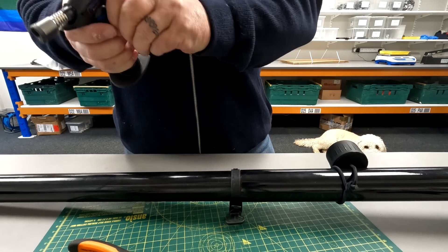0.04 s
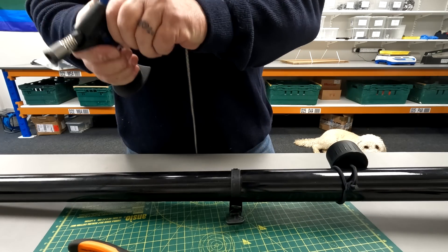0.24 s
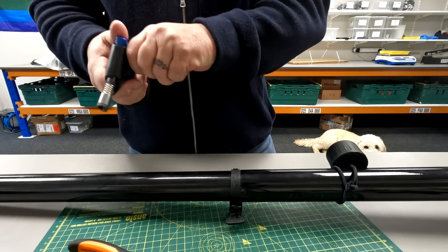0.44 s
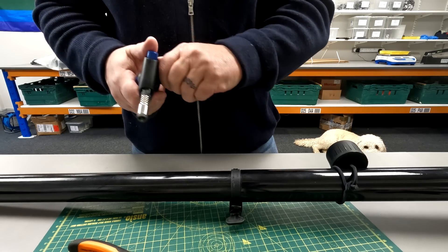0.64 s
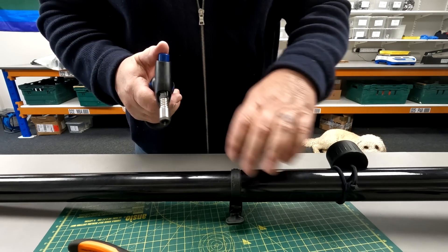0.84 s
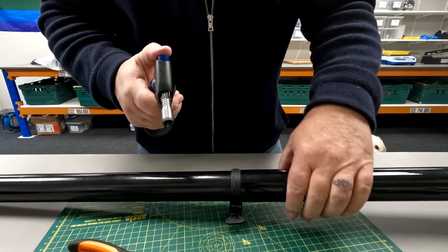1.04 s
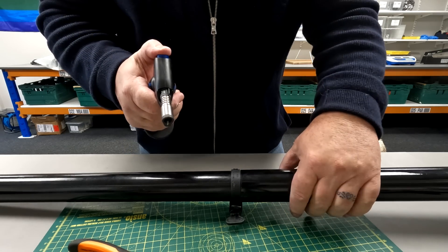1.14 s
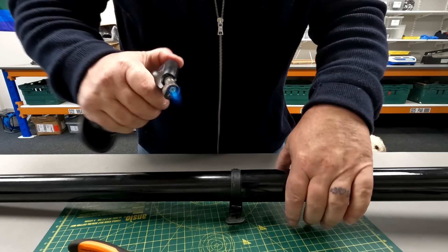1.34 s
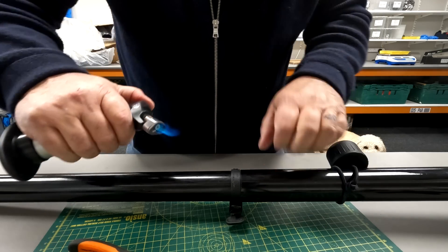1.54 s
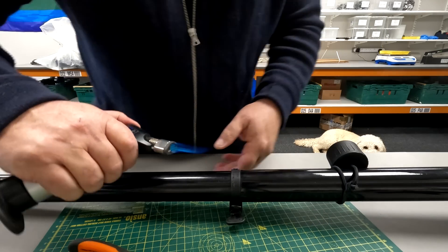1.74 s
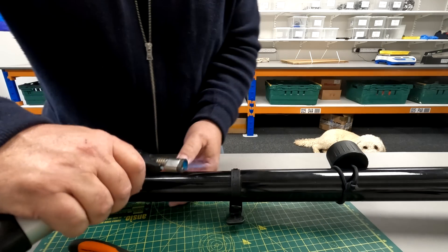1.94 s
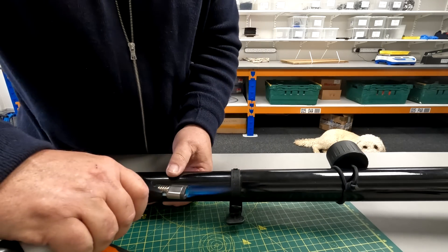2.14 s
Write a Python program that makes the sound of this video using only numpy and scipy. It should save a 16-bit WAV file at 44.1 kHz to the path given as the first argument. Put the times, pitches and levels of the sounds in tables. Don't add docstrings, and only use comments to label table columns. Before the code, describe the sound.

A small gas torch close to a stereo microphone in a quiet, hard-walled workshop: light knob ticks, faint gas seep, two sharp igniter snaps, a soft ignition pop, then steady hissing flame with a thin whistle.

```python
import sys
import numpy as np
from scipy import signal
from scipy.io import wavfile
from scipy.ndimage import uniform_filter1d

SR = 44100
rng = np.random.default_rng(int(sys.argv[2]) if len(sys.argv) > 2 else 0)


def inscribe(sig):
    pcm = np.round(np.clip(np.atleast_2d(sig).T, -1, 1) * 32767)
    wavfile.write(sys.argv[1], SR, pcm.astype(np.int16))


def convert_level_to_amplitude(level_db):
    exponent = np.asarray(level_db, float) / 20
    return 10 ** exponent


N = 96534

# (frequency [Hz], correlation [0-1])
NEAR_SAME = [(60, 1), (300, 0.81), (1600, 0.96), (5000, 0.74), (15000, 0.51)]


def evened(x):
    return x / np.sqrt(np.mean(x ** 2) + 1e-20)


def read(points, hz):
    f, value = np.transpose(points)
    return np.interp(np.log(hz + 1), np.log(f + 1), value)


def gain_curve(rows, col=1, edge=.01):
    s, db = np.transpose(rows)[[0, col]]
    s = np.r_[s[0] - edge, s, s[-1] + edge]
    db = np.r_[-120, db, -120]
    return convert_level_to_amplitude(np.interp(np.arange(N) / SR, s, db))


def add(mix, s, sound):
    part = mix[..., round(s * SR):][..., :sound.shape[-1]]
    part += sound[..., :part.shape[-1]]


def ring(x, hz, width):
    r = np.exp(-np.pi * width / SR) * np.exp(2j * np.pi * hz / SR)
    for _ in range(2):
        x = signal.lfilter([1 - abs(r)], [1, -r], x)
    return 2 * x.real


def noise(colour, same, patchy_db, flicker_db):
    frames = N // 256 + 5
    hz = np.fft.rfftfreq(1024, 1 / SR)
    a, b, c, d, patch = rng.standard_normal((frames, 513, 5)).T
    patch = uniform_filter1d(patch, size=10, axis=0)
    patch = evened(uniform_filter1d(patch, size=9, axis=1))
    like = np.clip(read(same, hz), -1, 1)[:, None]
    left = a + 1j * b
    right = like * left + np.sqrt(1 - like ** 2) * (c + 1j * d)
    flicker = flicker_db * rng.standard_normal(frames)
    z = np.array([left, right]) * convert_level_to_amplitude(read(colour, hz)[:, None] + patchy_db * patch + flicker)
    return evened(signal.istft(z, nperseg=1024, noverlap=768)[1][:, :N])


def rings(table, patchy_db):
    x = noise([(20, 0), (20000, 0)], NEAR_SAME, patchy_db, flicker_db=0.5)
    return sum(convert_level_to_amplitude(db) * evened(ring(x, hz, width)) for hz, width, db in table)


def swell(start, length, db, hz, width):
    u = np.clip((np.arange(N) / SR - start) / length, 0, 1)
    return np.sin(np.pi * np.sqrt(u)) * rings([(hz, width, db)], patchy_db=1.5)


def snap(impacts, modes):
    # (frequency [Hz], density [dB per Hz])
    crack_colour = [(800, -36), (1400, -11), (3000, -5), (6500, 0), (9500, -5), (16000, -6)]
    out, t = np.zeros((2, N)), np.arange(5000) / SR
    grit = noise(crack_colour, NEAR_SAME, patchy_db=1.5, flicker_db=-2.5)[0]
    low_modes = sum(m[0] < 5200 for m in modes)
    for s, db in impacts:
        luck = rng.uniform([.7, .994], [1.1, 1.006], (len(modes), 2))
        luck[:low_modes:2, 0] *= -1
        body = np.zeros(len(t))
        for (hz, mode_db, t60), (strength, detune) in zip(modes, luck):
            body += strength * convert_level_to_amplitude(mode_db - 60 * t / t60) * np.sin(2 * np.pi * hz * detune * t)
        crack = convert_level_to_amplitude(-5 - 60 * t / .009) * grit[round(s * SR):][:5000]
        add(out, s, convert_level_to_amplitude(db) * np.minimum(t / .0002, 1) * np.array([crack, body]))
    return out


def workshop():
    # (frequency [Hz], density [dB per Hz])
    air_colour = [(20, 3), (80, 2), (300, -4), (660, -11.5), (1000, -18), (2000, -15), (3000, -16),
                  (6000, -16), (12800, -24.5), (13100, -53)]
    # (frequency [Hz], correlation [0-1])
    air_same = [(60, 0.93), (250, 0.81), (900, 0.022), (3800, 0.34), (15000, 0.68)]
    # (time [s], level [dB])
    tone_curve = [
        (0, -52),
        (.15, -57.5),
        (.45, -59),
        (.75, -58.5),
        (.95, -71),
        (1.3, -52.5),
        (2.19, -61),
    ]
    hum_hz = 48.4
    rumble = evened(ring(rng.standard_normal(N), hum_hz, width=23))
    tone = np.sqrt(2) * gain_curve(tone_curve) * np.sin(2 * np.pi * hum_hz * np.arange(N) / SR)
    air = noise(air_colour, air_same, patchy_db=1.5, flicker_db=0.0)
    return convert_level_to_amplitude(-63.5) * air + convert_level_to_amplitude(-62) * rumble + tone


def thumps():
    # (time [s], level [dB], frequency [Hz], t60 [s])
    pushes = [(1.102, -32, 90, .053), (1.105, -40, 215, .07), (1.15, -50, 130, .1), (1.309, -22, 71, .082),
              (1.314, -20.5, 162, .042), (1.425, -26, 139, .045), (1.427, -31, 350, .028),
              (1.427, -40, 616, .035), (1.426, -46, 950, .03), (1.425, -48, 1550, .03),
              (1.425, -54, 2300, .02), (1.4375, -30, 200, .04), (1.436, -38, 480, .035),
              (1.7, -37, 60, .15), (1.772, -33, 120, .095)]
    out, t = np.zeros(N), np.arange(9000) / SR
    for s, db, hz, t60 in pushes:
        add(out, s, convert_level_to_amplitude(db - 60 * t / t60) * np.minimum(t / 0.0024, 1) * np.sin(2 * np.pi * hz * t))
    return out


def ticks():
    # (time [s], peak level [dB], t60 [s], ring frequency [Hz])
    touches = [(.0005, -36.5, 0.023, 4750), (.0035, -44.5, 0.027, 4400), (0.022, -47.5, 0.038, 13000),
               (0.032, -43, 0.012, 2740), (0.038, -38, 0.048, 6020), (0.144, -50, 0.016, 3680),
               (.15, -44, 0.02, 4480), (0.153, -47.5, 0.02, 5100), (.153, -58, 0.06, 5850),
               (0.167, -50, 0.058, 6000), (0.184, -43.5, 0.019, 4130), (.19, -49, 0.027, 6200),
               (.233, -66, 0.018, 6300), (0.409, -44, 0.025, 3050), (0.415, -49.5, 0.13, 1390),
               (0.42, -48, 0.017, 4530), (0.422, -48, 0.022, 2580), (.47, -65, 0.36, 2300),
               (.612, -62, 0.093, 2250), (0.6402, -48, 0.022, 3180), (0.651, -40, 0.015, 6100),
               (.652, -43, 0.014, 7600), (0.651, -50.5, 0.018, 12500), (.793, -58, 0.0096, 1900),
               (0.919, -53, 0.012, 6000), (1.002, -53.5, 0.017, 7600)]
    # (frequency [Hz], density [dB per Hz])
    grit_colour = [(250, -14), (800, -32), (1400, -7), (3000, -1.5), (6000, -1.5), (15500, -21)]
    out, t = np.zeros((2, N)), np.arange(8000) / SR
    grit = noise(grit_colour, NEAR_SAME, patchy_db=1, flicker_db=.1)[0]
    for s, db, t60, hz in touches:
        burst = grit[round(s * SR):][:8000]
        piece = 1.4 * evened(ring(burst, hz, width=300))
        add(out, s, convert_level_to_amplitude(db - 5.5 - 60 * t / t60) * np.array([burst, piece]))
    return out


def knob():
    # (time [s], level [dB])
    clicks = [
        (.3947, -35.5),
        (.3961, -28),
        (.3968, -39),
        (.399, -51),
        (.4015, -42),
    ]
    # (frequency [Hz], level [dB], t60 [s])
    knob_modes = [(287, -16.5, 0.038), (888, -15.5, 0.03), (1318, -11.5, 0.026), (1620, -4.5, 0.011),
                  (1960, -5.5, 0.014), (3100, -8.5, 0.015), (4580, -3.5, 0.015), (6070, -2.5, 0.015),
                  (7380, -6, 0.016), (9100, -14, .008), (11100, -9, 0.0096)]
    return snap(clicks, knob_modes)


def igniter():
    # (time [s], level [dB])
    press = [
        (1.2351, -22),
        (1.2358, -2),
        (1.2372, -12),
        (1.2402, -15),
    ]
    # (time [s], level [dB])
    release = [
        (1.3061, -25),
        (1.3071, -9),
        (1.3079, -2),
        (1.3089, -4.5),
        (1.3103, -10),
        (1.3125, -22),
        (1.3145, -28),
    ]
    # (frequency [Hz], level [dB], t60 [s])
    press_modes = [(1338, -14, 0.013), (2240, -19.5, 0.0084), (3170, -15.5, 0.0028), (4000, -12, 0.0041),
                   (4860, -7, .004), (5470, -19, 0.0071), (6020, -2, 0.012), (6200, -5, 0.012),
                   (6720, -10.5, 0.0062), (7600, -7.5, 0.0039), (10050, -22.5, 0.0068), (10230, -19, 0.01),
                   (15200, -3, 0.0054)]
    release_modes = [(1508, -9, 0.019), (2590, -10.5, 0.0046), (3205, -8, 0.012), (3833, -16.5, 0.013),
                     (4720, -23, 0.0043), (5300, -21.5, 0.0062), (6000, -4, .011), (6300, -9.5, 0.007),
                     (6830, -12, 0.0086), (7070, -9.5, 0.009), (7604, -3, 0.019), (8900, -11.5, 0.0082),
                     (10500, -17, 0.014), (13820, -8, 0.0055)]
    snaps = snap(press, press_modes) + snap(release, release_modes)
    return signal.sosfilt(signal.butter(4, 1100, "high", fs=SR, output="sos"), snaps)


def gas():
    # (time [s], level [dB])
    seep = [
        (.655, -59.5),
        (.69, -61.5),
        (.78, -60),
        (.9, -59),
        (1.06, -54),
        (1.16, -54.5),
        (1.22, -65),
    ]
    # (frequency [Hz], width [Hz], level [dB])
    seep_rings = [(1818, 152, 2), (374, 150, -8), (2900, 1600, -5.5), (3930, 1750, -11.5)]
    # (time [s], hiss level [dB], nozzle whistle level [dB])
    jet = [(1.09, -87, -75), (1.14, -64.5, -51), (1.22, -54, -46), (1.33, -59.5, -50), (1.45, -57, -61),
           (1.6, -54.5, -49), (1.72, -53.5, -48), (1.81, -51.5, -50.5), (1.91, -51.5, -49),
           (1.97, -51.5, -40.5), (2.04, -53, -42.5), (2.19, -51.5, -50)]
    # (frequency [Hz], density [dB per Hz])
    jet_colour = [(1120, -44), (1900, -16), (3630, -8.5), (4290, -7), (9120, -16), (10500, -18.5),
                  (15800, -39)]
    # (frequency [Hz], width [Hz], level [dB])
    jet_rings = [(6200, 970, -6.5), (9170, 590, -4), (15070, 3200, 1), (5660, 900, -10.5)]
    # (time [s], shift [Hz])
    slide = [
        (1.45, -200),
        (1.65, 0),
        (1.8, 300),
        (1.85, -100),
        (2.0, 120),
        (2.17, 600),
    ]

    hiss = noise(jet_colour, NEAR_SAME, patchy_db=-1.0, flicker_db=1.0) + rings(jet_rings, patchy_db=2.5)
    shift_hz = np.interp(np.arange(N) / SR, *np.transpose(slide), left=0)
    turn = 2 * np.pi * np.cumsum(shift_hz) / SR
    skirt = signal.hilbert(rings([(4300, 400, -2)], patchy_db=3.5)) * np.exp(1j * turn)
    line = signal.hilbert(rings([(4270, 55, -4)], patchy_db=0.0)) * np.exp(1j * .3 * turn)
    whistle = (line + skirt).real
    seeping = gain_curve(seep) * rings(seep_rings, patchy_db=1.3)
    return seeping + gain_curve(jet, col=1) * hiss + gain_curve(jet, col=2) * whistle


def flame():
    # (frequency [Hz], width [Hz], level [dB])
    flare_rings = [(1550, 230, -1), (3430, 3700, -20), (6750, 4800, 0), (11800, 7100, -4)]
    # (time [s], level [dB])
    burning = [(1.325, -34.5), (1.36, -43), (1.415, -41.5), (1.45, -37), (1.53, -40.5), (1.6, -45.5),
               (1.77, -37.5), (1.86, -42.5), (2.03, -39), (2.115, -41.5), (2.26, -42.5)]
    # (frequency [Hz], density [dB per Hz])
    flame_colour = [(20, 7.5), (50, -0.5), (170, 2.5), (260, -9), (430, -22), (1100, -33), (1500, -45)]
    # (time [s], level [dB])
    pipe_wash = [
        (1.42, -71),
        (1.52, -86),
        (1.62, -63.5),
        (1.72, -64.5),
        (1.78, -48),
        (1.86, -53.5),
        (1.91, -50),
        (1.99, -55.5),
        (2.045, -57),
        (2.26, -64),
    ]
    # (frequency [Hz], width [Hz], level [dB])
    pipe_rings = [(506, 530, -0.5), (1260, 560, -9), (3160, 1100, -7), (14300, 1600, -3)]
    # (time [s], level [dB])
    tube_wash = [
        (1.55, -76),
        (1.6, -59.5),
        (1.72, -63),
        (1.78, -50.5),
        (1.86, -57.5),
        (1.91, -51),
        (1.99, -51.5),
        (2.04, -66),
        (2.1, -70),
    ]
    # (frequency [Hz], width [Hz], level [dB])
    tube_rings = [(1629, 350, -0.5), (1560, 120, -5.5)]

    t = np.arange(N) / SR - 1.297
    flare = (t > 0) * convert_level_to_amplitude(-34 - 60 * abs(t) / 0.28) * rings(flare_rings, patchy_db=2.0)
    rumble = gain_curve(burning) * noise(flame_colour, NEAR_SAME, patchy_db=2.5, flicker_db=1.5)
    pipe = gain_curve(pipe_wash) * rings(pipe_rings, patchy_db=2.0)
    pipe_note = swell(start=1.75, length=.12, db=-47, hz=663, width=26)
    tube = gain_curve(tube_wash) * rings(tube_rings, patchy_db=0.9)
    return flare + rumble + pipe + pipe_note + tube


def walls(grit, body):
    # (frequency [Hz], t60 [s])
    shop_t60 = [(500, 1), (3000, 0.39), (12000, 0.21)]
    taps = np.zeros((2, SR // 2))
    at = np.arange(300, SR // 2 - 20, 20) + rng.integers(0, 20, (2, (SR // 2 - 301) // 20))
    np.put_along_axis(taps, at, rng.choice([-1., 1.], at.shape), 1)
    hz, t, z = signal.stft(taps, SR, nperseg=256)
    tail = signal.istft(z * convert_level_to_amplitude(-60 * t / read(shop_t60, hz)[:, None]), SR, nperseg=256)[1]
    tail = convert_level_to_amplitude(-14) * tail / np.linalg.norm(tail[0])
    bench = np.zeros((2, 300))
    np.put_along_axis(bench, rng.integers(8, 300, (2, 5)), convert_level_to_amplitude(-11) * rng.uniform(-1, 1, (2, 5)), 1)
    direct = grit + body
    early = signal.fftconvolve(direct[None], bench, axes=1)[:, :N]
    late = signal.fftconvolve((grit + convert_level_to_amplitude(-9) * body)[None], tail, axes=1)[:, :N]
    return direct + early + late


def scene():
    hits = walls(*(ticks() + knob() + igniter()))
    rub = swell(start=1.005, length=.09, db=-57, hz=1400, width=300)
    return workshop() + thumps() + hits + rub + gas() + flame()


def low_pass(x):
    return signal.sosfilt(signal.butter(12, 17000, fs=SR, output="sos"), x)


def record(dry):
    pair = np.array([dry[0], np.r_[0, dry[1, :-1]]])
    low, wide = (signal.firwin(511, hz, window=("kaiser", 9), fs=SR) for hz in (15800, 16600))
    band = low + convert_level_to_amplitude(-16) * (wide - low)
    mix = signal.oaconvolve(np.clip(pair, -1, 1), band[None], "same")
    return low_pass(mix)


dry = scene()
out = record(dry)
inscribe(out)
```